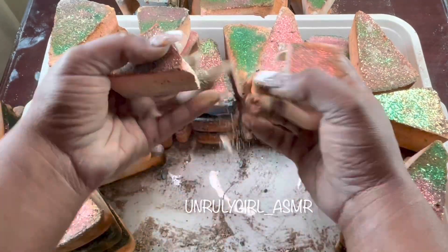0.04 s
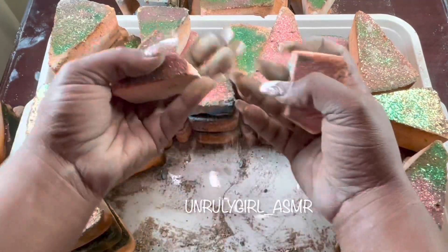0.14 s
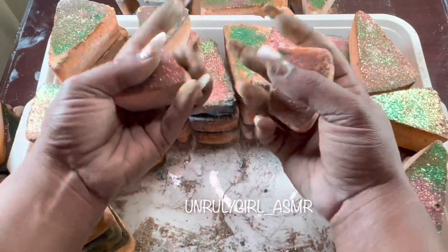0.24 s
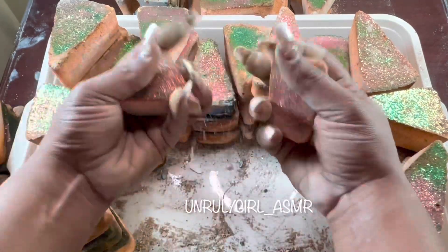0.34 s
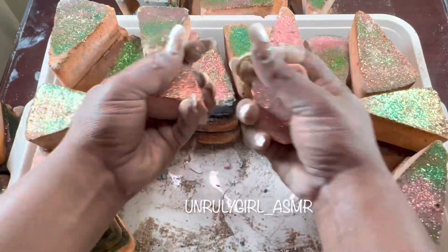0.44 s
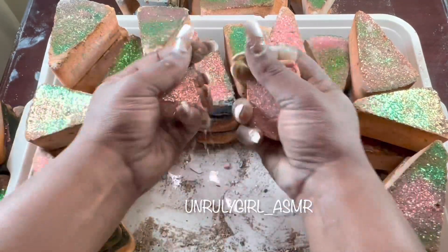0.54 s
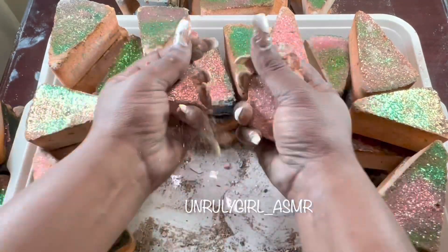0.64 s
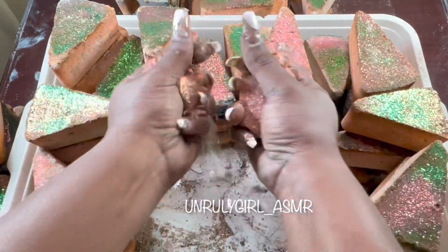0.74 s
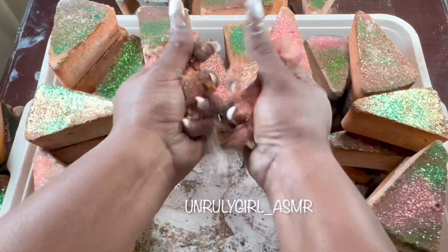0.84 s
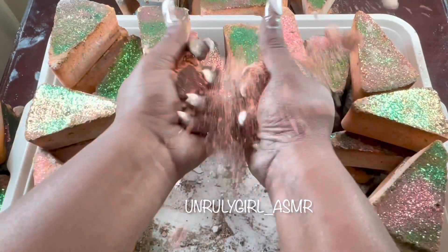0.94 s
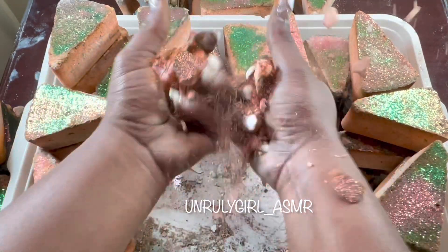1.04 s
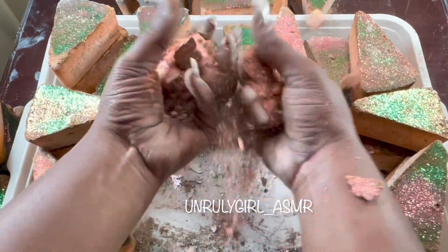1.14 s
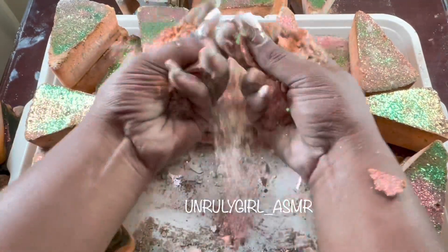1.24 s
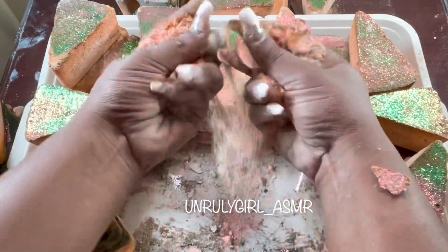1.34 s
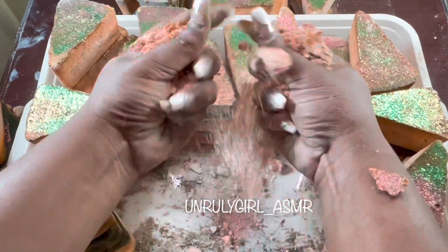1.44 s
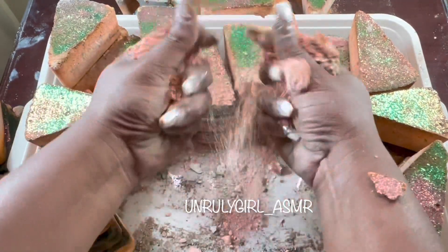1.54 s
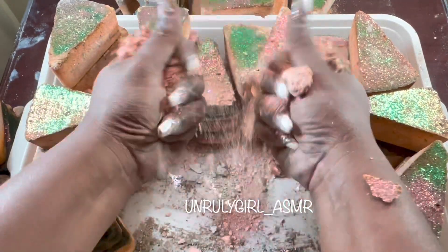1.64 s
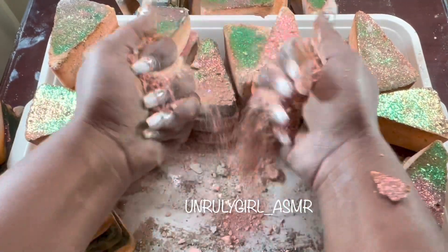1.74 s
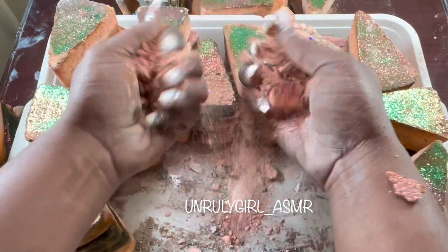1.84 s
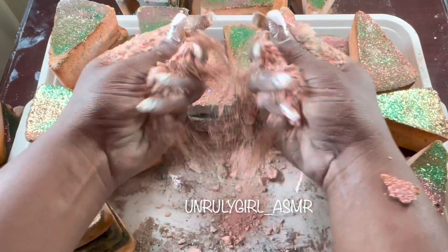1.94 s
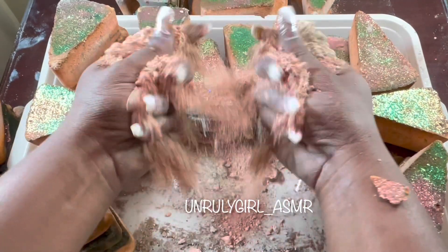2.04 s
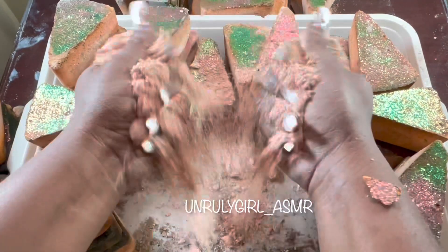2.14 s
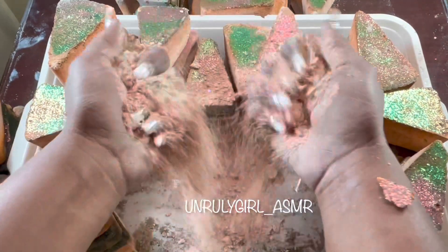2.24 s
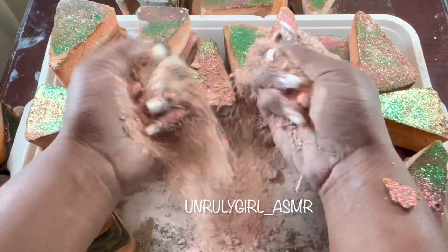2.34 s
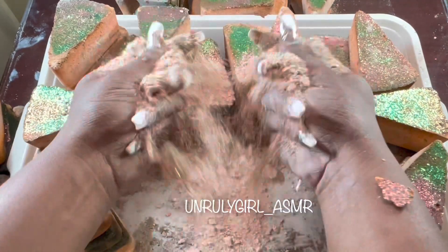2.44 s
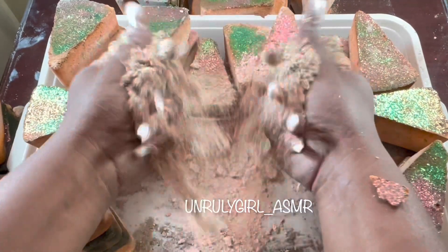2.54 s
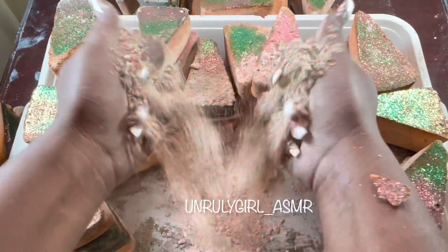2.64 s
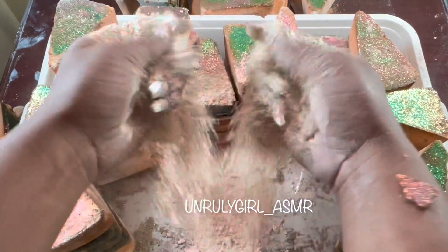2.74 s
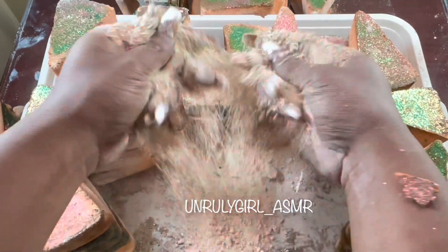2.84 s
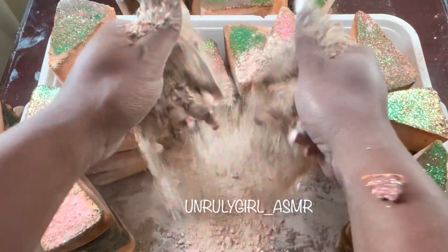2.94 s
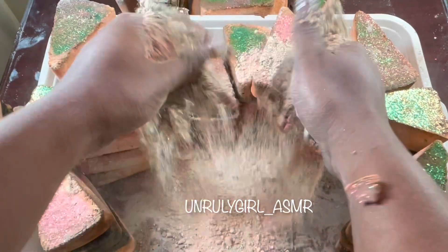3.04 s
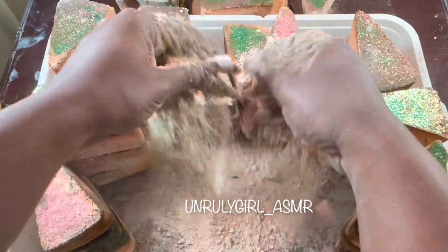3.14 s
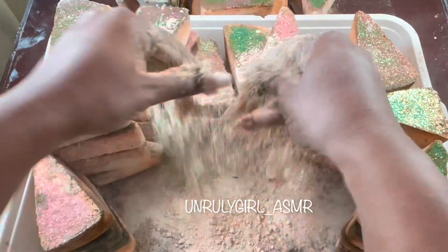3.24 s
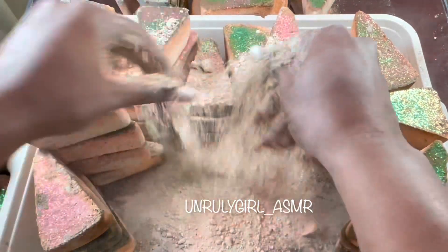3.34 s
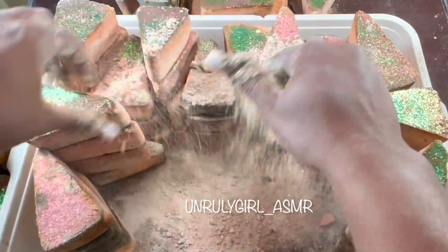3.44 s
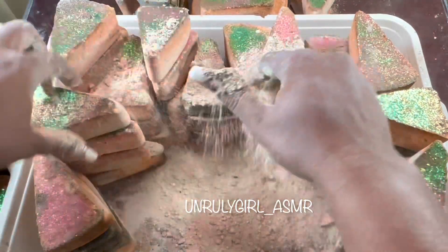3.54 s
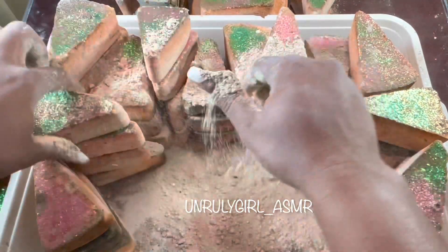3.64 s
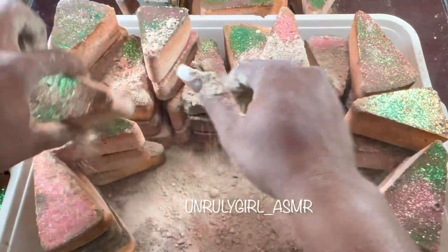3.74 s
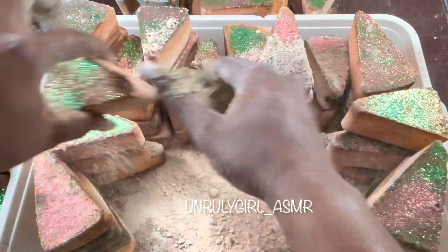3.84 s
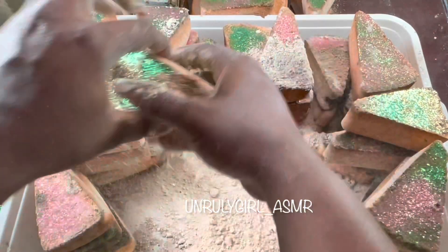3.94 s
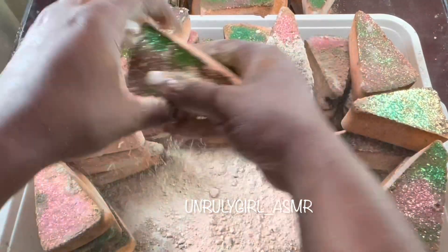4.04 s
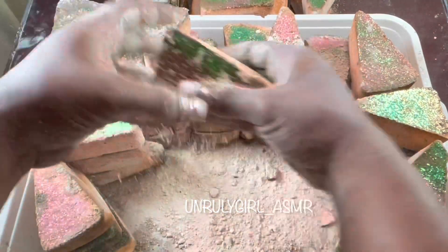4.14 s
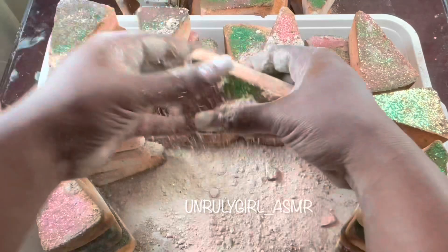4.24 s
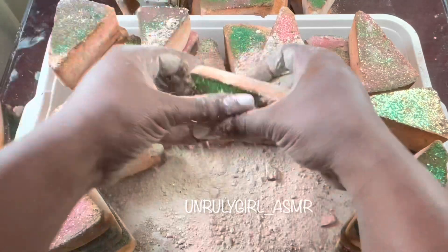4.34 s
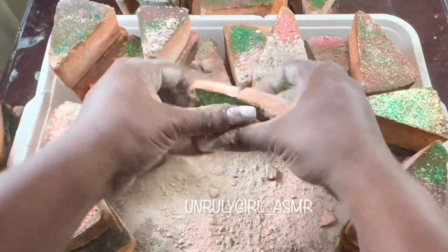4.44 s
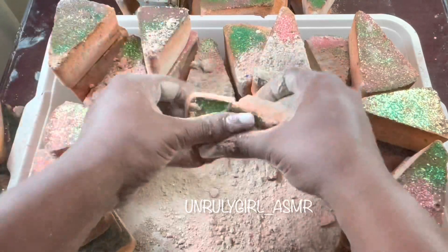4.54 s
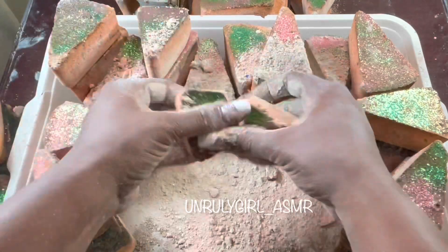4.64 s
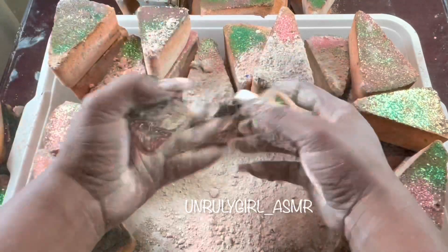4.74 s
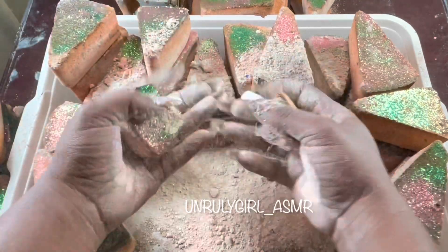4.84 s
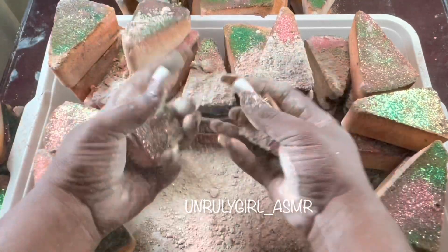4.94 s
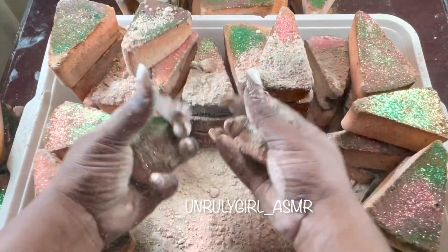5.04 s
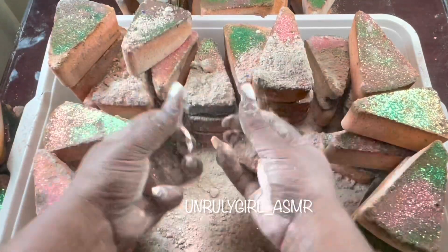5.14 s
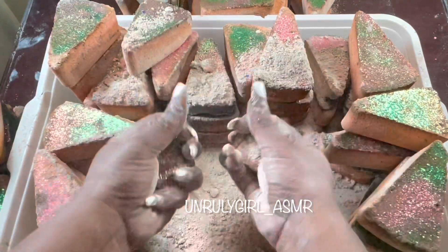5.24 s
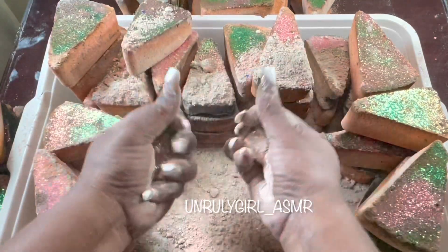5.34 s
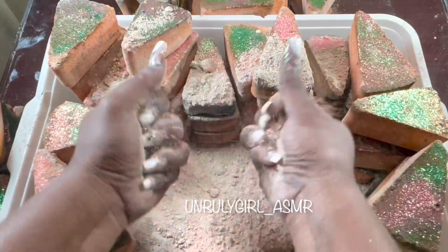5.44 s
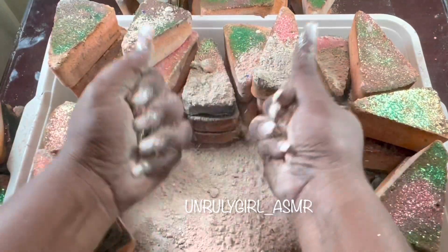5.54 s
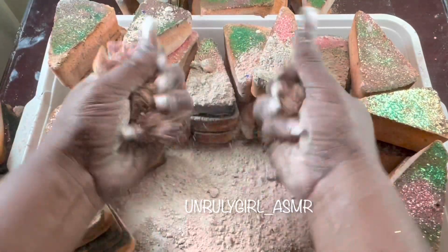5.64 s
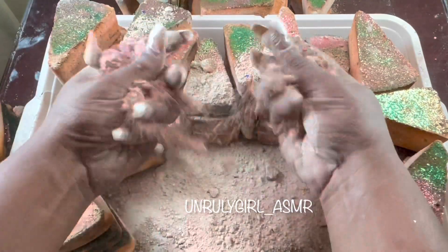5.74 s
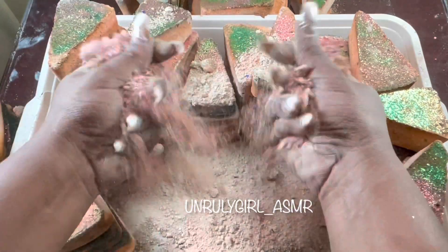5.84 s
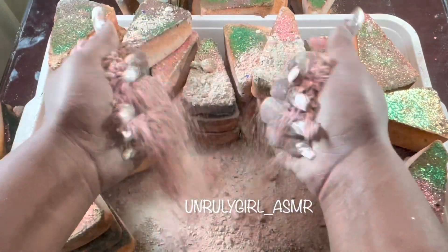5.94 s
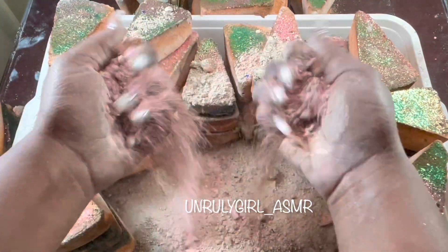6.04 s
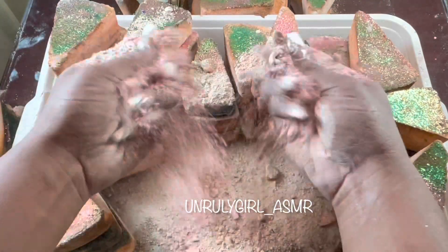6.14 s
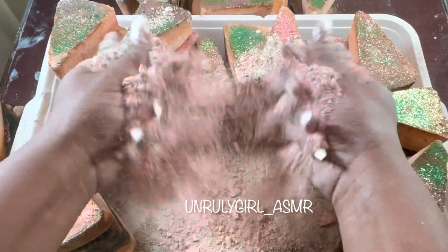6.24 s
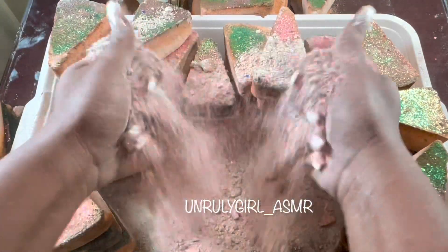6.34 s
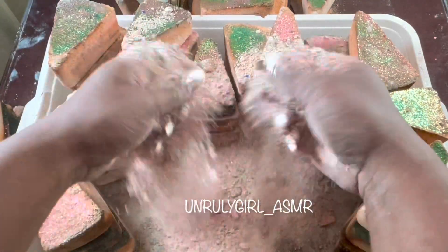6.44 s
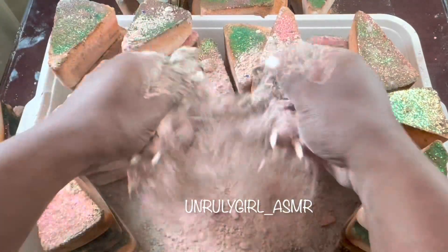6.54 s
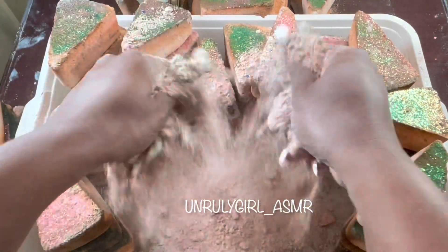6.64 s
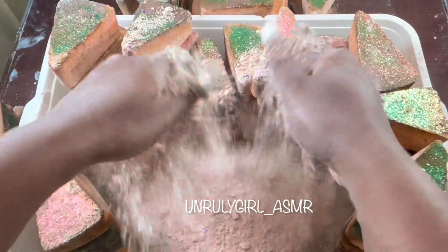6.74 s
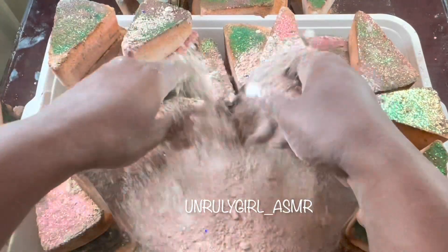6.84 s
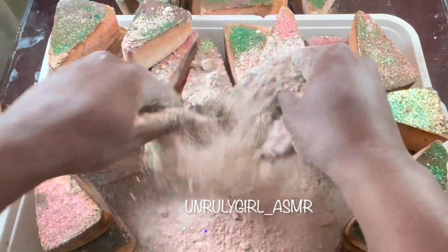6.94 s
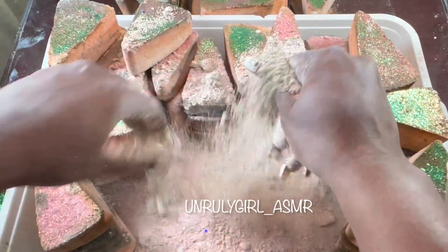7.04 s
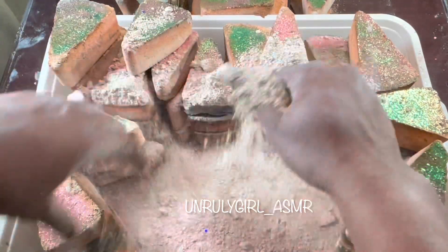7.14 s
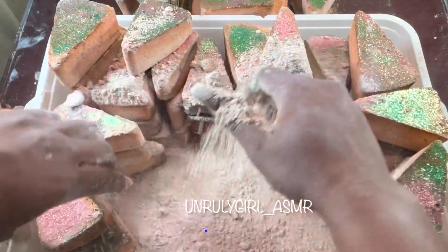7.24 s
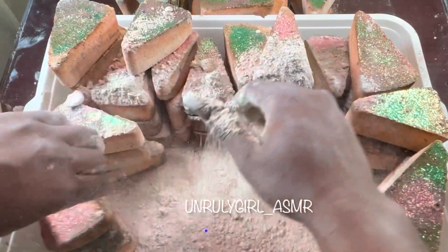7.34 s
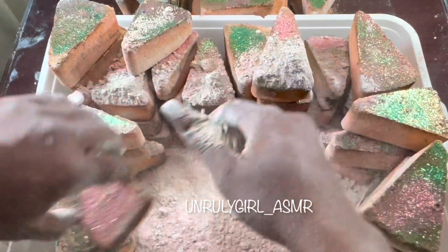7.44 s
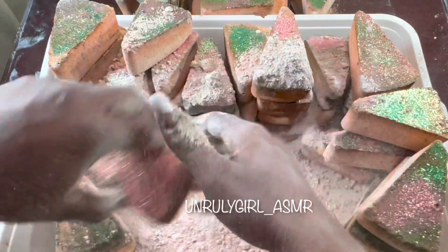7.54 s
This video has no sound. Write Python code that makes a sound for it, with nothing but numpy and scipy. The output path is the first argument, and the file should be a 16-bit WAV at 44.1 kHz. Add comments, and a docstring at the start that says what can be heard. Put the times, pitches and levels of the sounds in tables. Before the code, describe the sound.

Very close stereo capture of two hands crushing dry chalk blocks over a plastic tub in a small quiet room. Squeaky rubs and dusty handling lead to a dense run of sharp snaps and crunches, thinning into gritty crumbling. After a quieter pause of rubbing, one bright snap breaks a fresh slab, then another handful crumbles. Low hum continues underneath.

```python
"""Mains hum, rumble and faint hiss lie under two hands crushing dry chalk over a plastic tub, near two ports.
Rubs and dusty handling open; blocks snap, knock in the palms and crumble to lumps, grit and powder to 3.5 s.
Fingers then rub a fresh slab and break it; from 5.6 s a second handful crumbles until the last snaps at 7.4 s.
Snaps are decaying sines and filtered clicks, crumbs are random clicks in three colours, rubs are slips plus a
squeak; decaying sine modes ring the room's low modes and the tub, and sparse filtered clicks make the small
room."""
import sys
import numpy as np
from scipy import signal
from scipy.fft import rfft, irfft, next_fast_len
from scipy.io import wavfile
from scipy.ndimage import uniform_filter1d, map_coordinates

SR = 44100
rng = np.random.default_rng(int(sys.argv[2]) if len(sys.argv) > 2 else 0)


def transcribe(signal):
    """Save signal, clipped to [-1, 1], as a 16-bit WAV file at the path in sys.argv[1]."""
    frames = np.atleast_2d(signal).T
    limited = np.clip(frames, -1, 1)
    pcm = np.round(limited * 32767).astype(np.int16)
    wavfile.write(sys.argv[1], SR, pcm)


N = 333837
TIME = np.arange(N) / SR

# Table levels are ahead of later trims and filters; colours and modes are scaled to unit energy. Loudest
# fractures. Each row: start in seconds, crack level in dB, crack pitch in Hz, grit spray in dB, powder spray in
# dB, thud in dB.
FRACTURES = [(0.088, -18, 2730, -22.5, -34, -47), (0.486, -12.5, 1680, -21, -19, -36),
             (0.548, -15.5, 2200, -24.5, -33.5, -32.5), (0.652, -14, 1740, -50, -31, -32),
             (0.701, -4.5, 2100, -9.5, -27.5, -28.5), (0.808, -21, 1810, -21.5, -24, -31.5),
             (0.901, -40, 8000, -55, -32.5, -65), (0.967, -32, 880, -24.5, -25.5, -41),
             (1.006, -10.5, 1060, -23, -38, -25), (1.024, -9, 1540, -35, -48, -28.5),
             (1.06, -11.5, 916, -22, -28, -25.5), (1.091, -11.5, 2870, -27, -29, -29),
             (1.135, -9, 996, -25, -46, -33), (1.139, -22, 1920, -34, -37, -49),
             (1.226, -18, 2900, -21, -25, -41), (1.263, -12, 890, -27, -25.5, -28.5),
             (1.277, -9, 966, -28, -44, -30), (1.313, -31, 3270, -42, -22, -34),
             (1.363, -21, 1500, -48, -51, -56), (1.397, -5, 994, -33, -29, -23.5),
             (1.398, -20, 1590, -35, -40, -45), (1.506, -18.5, 1530, -24.5, -49, -40),
             (1.551, -31, 6060, -23.5, -22.5, -33.5), (1.666, -15.5, 1710, -34, -30, -39.5),
             (1.787, -22, 1160, -22.5, -35, -61), (1.822, -19.5, 1680, -40, -51, -60),
             (1.862, -21.5, 1640, -28, -50, -41.5), (1.943, -14, 1160, -46, -54, -41),
             (1.974, -30, 3480, -44, -24.5, -56), (2.112, -18, 2860, -35, -24, -61),
             (2.222, -20.5, 5900, -39, -27.5, -37.5), (2.385, -19, 1480, -27, -52, -39),
             (2.443, -16, 5800, -55, -33, -70), (2.565, -22, 9600, -32, -16, -46.5),
             (2.709, -17, 1790, -22.5, -28, -65), (2.79, -29, 1460, -29, -29.5, -63),
             (3.007, -14.5, 2070, -37, -41, -61), (3.09, -19, 1480, -24.5, -44, -65),
             (3.244, -14.5, 2740, -22.5, -29.5, -29), (3.36, -25, 1250, -30, -49, -40),
             (3.54, -18, 2050, -28, -38, -70), (3.586, -12.5, 1214, -31, -57, -70),
             (3.599, -17.5, 1250, -43, -46, -67), (4.02, -29.5, 1870, -56, -31.5, -69),
             (4.107, -36, 2270, -62, -43, -79), (4.174, -30.5, 2120, -46, -55, -72),
             (4.209, -28.5, 2030, -56, -45, -82), (4.4346, -23.5, 2250, -30, -27, -39),
             (4.7276, -3.5, 6700, -30, -15.5, -47.5), (4.843, -27, 6740, -57, -25.5, -61),
             (5.167, -51, 910, -39.5, -38.5, -41), (5.233, -34, 1150, -33, -70, -39),
             (5.254, -28, 2330, -38.5, -47, -61), (5.302, -50, 695, -41, -46, -45),
             (5.375, -41, 2000, -27.5, -33, -42), (5.389, -17, 1070, -21.5, -31, -37),
             (5.392, -10.5, 2560, -21, -30, -52), (5.839, -16.5, 1176, -27, -36, -35.5),
             (5.929, -17, 1810, -22, -24, -39), (5.9518, -11, 1660, -16.5, -25, -42),
             (5.989, -11.5, 1830, -22.5, -37, -43), (6.344, -24, 1330, -42, -24, -42),
             (6.399, -9, 8800, -47, -20, -42), (6.518, -12, 1200, -24, -33.5, -34),
             (6.517, -12, 4090, -33, -34, -60), (6.78, -17, 2120, -25.5, -21.5, -48),
             (6.896, -33, 890, -28.5, -31.5, -33.5), (7.04, -29.5, 1000, -32, -58, -36),
             (7.063, -10, 1030, -30, -54, -35.5), (7.224, -37, 1360, -52, -60, -48),
             (7.414, -28.5, 2150, -45, -32, -41.5)]
# Blocks bumping the cupped palms. Each row: start in seconds, level in dB, pitch in Hz, scuff in dB.
PALM_KNOCKS = [(0.408, -21.5, 78, -83), (0.488, -22, 246, -48), (4.436, -16, 292, -44),
               (4.845, -31, 250, -47.5), (4.87, -33, 80, -67), (4.966, -27, 367, -44),
               (5.388, -20, 222, -77), (5.4, -26.5, 67.6, -76), (7.346, -31, 190, -64)]
# Colours of the three grain sizes. Each row: frequency in Hz, relative density in dB per Hz.
LUMP_COLOUR = [(60, -15), (150, -1.5), (240, -1), (450, -2.5), (750, -8), (1300, -20.5), (4000, -83)]
GRIT_COLOUR = [(200, -89), (600, -7.5), (1000, 4), (1500, 4), (2200, 3.5), (3400, -1), (5000, -1),
               (8000, -41.5), (13000, -38.5)]
POWDER_COLOUR = [(500, -50), (2000, -12.5), (3200, -6.5), (5000, -1), (6500, 1.5), (8300, 3), (10200, 6.5),
                 (11200, 0.5), (12300, -42), (15000, -68)]
LUMP_RING_CYCLES = 0.85  # a lump's pop has its envelope peak here


def gain_of(db):
    """Decibels to amplitude."""
    return 10 ** (np.asarray(db) / 20)


def evened(x):
    """Scales to rms 1."""
    return x / np.sqrt(np.mean(x ** 2) + 1e-20)


def read(points, hz):
    """Interpolates a table along a log-frequency axis."""
    f, value = np.transpose(points)
    return np.interp(np.log(hz + 1), np.log(f + 1), value)


def add(mix, start_s, sound):
    """Mixes a sound in place at start_s, cut at the end of the mix."""
    part = mix[max(round(start_s * SR), 0):][:len(sound)]
    part += sound[:len(part)]


def coloured(x, spectrum):
    """Minimum-phase filter of unit energy: each click takes the spectrum and keeps its sharp front."""
    log_gain = np.log(gain_of(read(spectrum, abs(np.fft.fftfreq(2048, 1 / SR)))))
    taps = np.fft.ifft(np.exp(np.conj(signal.hilbert(log_gain)))).real[:1024]
    return signal.oaconvolve(x, taps / np.linalg.norm(taps))[:len(x)]


def drift(cutoff_hz):
    """Smooth random wander of rms 1: noise low-passed near cutoff_hz."""
    size = next_fast_len(N, real=True)
    lowpass = 1 / (1 + (np.fft.rfftfreq(size, 1 / SR) / cutoff_hz) ** 4)
    return evened(irfft(rfft(rng.standard_normal(size)) * lowpass, size)[:N])


def random_signs(shape):
    """Random polarities, +1 or -1."""
    return rng.choice([-1., 1.], shape)


def grains(per_s, spread_db, clump_db):
    """Tiny fractures as random clicks of rms 1; sizes spread exponentially in dB and swell in clumps."""
    size = gain_of(spread_db * np.minimum(rng.exponential(1, N), 4.5) + clump_db * drift(74))
    return evened(size * random_signs(N) * (rng.random(N) < per_s / SR))


def pop(hz, cycles):
    """A freed lump rings briefly: a sine whose envelope peaks at 1 after the given cycles."""
    turns = np.arange(SR // 10) * hz / SR
    envelope = turns / cycles * np.exp(1 - turns / cycles)
    return envelope * np.sin(2 * np.pi * turns)


def background():
    """Wavering mains hum over high-passed rumble, both alike at the ports, and separate hiss at each."""
    # Each row: frequency in Hz, rms level in dB.
    hum_partials = [(60, -55.5), (120, -47.5)]
    # Each row: frequency in Hz, relative density in dB per Hz.
    rumble_colour = [(15, -43.5), (30, 7.5), (55, 6), (80, 9), (110, 12.5), (170, -5.5), (300, -12.5),
                     (700, -68.5), (3000, -81)]
    hiss_colour = [(100, 10), (700, -7), (10500, -14), (12500, -39.5)]
    hum = np.zeros(N)
    for hz, db in hum_partials:
        level = gain_of(db + 0.7 * drift(3)) * np.sqrt(2)
        hum += level * np.sin(2 * np.pi * hz * TIME + 0.1 * drift(5))
    hiss = np.array([coloured(rng.standard_normal(N), hiss_colour) for _ in range(2)])
    highpass = signal.butter(3, 38, "high", fs=SR, output="sos")
    rumble = signal.sosfilt(highpass, coloured(rng.standard_normal(N), rumble_colour))
    return hum + gain_of(-49.5) * rumble + gain_of(-60.0) * hiss


def rubs():
    """Fingers slide over dry chalk: fine slips under a short swell, locking into a hoarse squeak."""
    # Each row: time at the loudest in seconds, scrape level in dB, rise in seconds, fall in seconds,
    # squeak pitch in Hz, squeak level in dB.
    strokes = [(0.03, -28.5, 0.031, 0.054, 6760, -32.5), (0.311, -18.5, 0.01, 0.026, 6100, -26),
               (.73, -26.5, 0.0099, 0.0076, 7200, -34), (3.826, -28.5, 0.0061, 0.0069, 3720, -29),
               (3.955, -40.5, 0.012, 0.024, 3110, -41), (4.06, -41.5, 0.05, 0.021, 5600, -47),
               (4.24, -41, 0.13, 0.068, 3060, -46), (4.574, -39.5, 0.022, 0.052, 5900, -39),
               (4.781, -31.5, 0.031, 0.017, 6960, -34), (4.821, -26.5, 0.0054, 0.0073, 5380, -31.5),
               (5.007, -29.5, 0.035, 0.019, 6100, -47)]
    # Each row: frequency in Hz, relative density in dB per Hz.
    rub_colour = [(400, -43), (1800, -15.5), (3100, -7.5), (4500, 1.5), (6400, 2), (8000, 6.5),
                  (10000, 10.5), (11300, 1.5), (12500, -14.5), (16000, -74.5)]
    pitch_wander, pitch_sag_per_s = 0.034, 0.25  # shares of the pitch; it sinks as the finger slows
    catch_db = 4
    slips = grains(per_s=12000, spread_db=-0.5, clump_db=2.5)
    scrape, squeak = np.zeros(N), np.zeros(N)
    wander = drift(450)
    # the finger catches and lets go
    grip = evened(np.maximum(drift(160) + 1, 0.5) * gain_of(catch_db * drift(40)))
    for peak_s, db, rise_s, fall_s, hz, squeak_db in strokes:
        near = abs(TIME - peak_s) < 0.3
        t = TIME[near] - peak_s
        swell = np.exp(-np.maximum(-t / rise_s, t / fall_s))
        pitch_hz = hz * (1 + pitch_wander * wander[near] - pitch_sag_per_s * t)
        turns = np.cumsum(pitch_hz) / SR
        scrape[near] += gain_of(db) * swell
        # squared swell: squeaks only under firm pressure
        squeak[near] += gain_of(squeak_db) * swell ** 2 * np.sin(2 * np.pi * turns)
    return coloured(scrape * slips, rub_colour) + squeak * grip


def held(start_s, end_s, rise_s, fall_s):
    """Envelope that swells up to start_s, holds, and dies away after end_s."""
    decay = np.maximum((start_s - TIME) / rise_s, (TIME - end_s) / fall_s)
    return np.exp(-np.clip(decay, 0, 20))


def shedding():
    """Levels in dB of grit, powder and lumps: grips, squeezes and handfuls add their power."""
    # Whole blocks turned, dust brushed off. Each row: start in seconds, end in seconds, powder in dB, lumps in dB.
    grips = [(0.074, 0.364, -42.5, -50.5), (0.43, 0.966, -50.5, -65.5), (3.405, 3.767, -57.5, -66),
             (3.83, 3.872, -44.5, -61), (3.939, 4.312, -51, -86), (4.577, 5.133, -54, -65),
             (5.172, 5.446, -52, -63), (7.312, 7.408, -49, -44)]
    # Fists tighten. Each row: time at the tightest in seconds, grit in dB, half length in seconds.
    squeezes = [(0.58, -48.5, 0.032), (0.737, -42, 0.077), (1.093, -40, 0.021), (1.44, -40.5, 0.05),
                (1.806, -42.5, 0.059), (2.173, -39.5, 0.086), (2.33, -43, 0.062), (3.011, -37, 0.05),
                (3.226, -42, 0.059), (3.617, -45, 0.056), (5.978, -42.5, 0.16), (6.388, -40, 0.11),
                (6.685, -40, 0.076)]
    # Broken handfuls crumble in the fists until dropped. Each row: start in seconds, end in seconds,
    # grit in dB, lumps in dB, sag in dB per second.
    handfuls = [(1.01, 3.46, -40, -46.5, 4.5), (5.576, 7.31, -49, -49, 1.5)]
    moves = []  # ([grit, powder, lumps] in dB, envelope)
    for start_s, end_s, grit_db, lumps_db, sag_db_per_s in handfuls:
        sag = gain_of(-sag_db_per_s * np.maximum(TIME - start_s, 0))
        shape = held(start_s, end_s, rise_s=0.048, fall_s=0.064) * sag
        moves.append(([grit_db, grit_db + 3, lumps_db], shape))
    for peak_s, db, half_s in squeezes:
        shape = np.exp(-np.minimum(0.5 * ((TIME - peak_s) / half_s) ** 2, 20))
        moves.append(([db, db - 2, db - 7.5], shape))
    for start_s, end_s, powder_db, lumps_db in grips:
        shape = held(start_s, end_s, rise_s=0.019, fall_s=0.016)
        moves.append(([powder_db - 13.5, powder_db, lumps_db], shape))
    levels_db, shapes = zip(*moves)
    return 10 * np.log10(gain_of(levels_db).T ** 2 @ np.square(shapes))


def chips(per_s, spread_db):
    """Small pieces break off at random, each popping at the pitch of its own size; rms 1."""
    out = np.zeros(N)
    for place, size, strength, ring in rng.random((int(per_s * N / SR), 4)):
        hz = 950 * 5 ** size
        level = gain_of(spread_db * min(-np.log(1 - strength), 2))
        add(out, place * N / SR, level * pop(hz, (0.5 + ring) / 2))
    return evened(out)


def patchy(x):
    """The mix of crumb sizes keeps changing, so bands swell and fade on their own."""
    uneven_db = 2.5
    z = signal.stft(x, nperseg=256)[2]
    field = uniform_filter1d(rng.standard_normal(z.shape), size=5, axis=0)
    field = evened(uniform_filter1d(field, size=6, axis=1))
    return signal.istft(z * gain_of(uneven_db * field), nperseg=256)[1][:N]


def crumbling():
    """Chalk gives way under pressure in three grain sizes, shedding chips as it goes."""
    # Each row: frequency in Hz, relative density in dB per Hz.
    chip_colour = [(100, -7.5), (10500, 11.5), (11500, 6), (12500, -32), (16000, -63.5)]
    grit_db, powder_db, lumps_db = shedding()
    squeeze_db = 1.0 * drift(13.0)  # the grip slips and catches for all sizes together
    grit_level = gain_of(grit_db + squeeze_db)
    grit = grains(per_s=4500, spread_db=3.4, clump_db=1.8) * grit_level
    powder = grains(per_s=8000, spread_db=2.5, clump_db=1.3) * gain_of(powder_db + squeeze_db + 3.0)
    lumps = grains(per_s=760, spread_db=3.0, clump_db=2.0) * gain_of(lumps_db + squeeze_db - 0.5)
    broken = chips(per_s=150, spread_db=7.5) * grit_level * gain_of(-3)
    flow = patchy(1.05 * coloured(grit, GRIT_COLOUR) + coloured(powder + 0.094 * grit, POWDER_COLOUR))
    return flow + coloured(broken, chip_colour) + coloured(lumps, LUMP_COLOUR)


def resonate(x, hz, width_hz):
    """One two-pole resonance, scaled so that white noise keeps its level."""
    r = np.exp(-np.pi * width_hz / SR)
    y = signal.lfilter([1, 0, -1], [1, -2 * r * np.cos(2 * np.pi * hz / SR), r * r], x)
    return y * np.sqrt((1 - r * r) / 2)


def piece(x, hz):
    """The broad, steep-sided ring of a lump of chalk; keeps the energy of x."""
    y = resonate(resonate(x, hz, hz * 0.9), hz, hz * 0.9)
    return y * np.linalg.norm(x) / (np.linalg.norm(y) + 1e-12)


def splinters(count=3):
    """After each break a few more pieces let go near the same pitch; later ones are weaker."""
    span_cycles, top_db = 15, -9  # of the break's pitch; relative to the break
    out = np.zeros(N)
    for start_s, peak_db, hz, *_ in FRACTURES:
        for k, (wait, size) in enumerate(rng.random((count, 2))):
            late = (k + 0.5 + wait) / (count + 0.5)
            level = gain_of(peak_db + top_db - 10 * late)
            sound = level * pop(hz * (0.85 + 0.5 * size), LUMP_RING_CYCLES)
            add(out, start_s + late * span_cycles / hz, sound)
    return out


def cracks():
    """A crack tears through the block, the freed lump pops in two modes; low pieces grind longer."""
    # Each row: frequency in Hz, relative density in dB per Hz.
    break_colour = [(100, 1.5), (900, 4.5), (10500, 12), (12500, 17.5), (16000, -37.5)]
    ring_spread, lead_s = 0.2, 0.008
    overtone_ratio, overtone_db, tear_db = 1.62, -9.5, -3.5  # levels relative to the pop
    t = np.arange(SR // 10) / SR - lead_s
    out = np.zeros(N)
    for start_s, peak_db, hz, grit_db, *_ in FRACTURES:
        cycles = LUMP_RING_CYCLES * np.exp(ring_spread * rng.uniform(-1, 1))
        ratio = overtone_ratio * rng.uniform(0.9, 1.1)
        overtone = gain_of(overtone_db) * pop(hz * ratio, cycles * ratio)
        add(out, start_s, gain_of(peak_db) * (pop(hz, cycles) + overtone))

        age = np.maximum(t, 0) * hz / 1.1
        tear = random_signs(len(t)) * age * np.exp(-age)
        crack = piece(tear, hz) + tear * (hz / 9000) ** 2.4  # small pieces also spit treble
        add(out, start_s - lead_s, gain_of(peak_db + tear_db) * crack / abs(crack).max())

        # faces start to give just before the crack, then grind near the same pitch
        contact = np.exp(-np.maximum(t / 0.014 * np.sqrt(hz / 1000), -t / 0.002))
        grind = random_signs(len(t)) * (rng.random(len(t)) < 0.06) * contact
        add(out, start_s - lead_s, gain_of(grit_db + 6) * piece(grind, hz * 1.1))
    return coloured(out + splinters(), break_colour)


def sprays(levels_db, fast_s, slow_s, slow_db):
    """Envelope of the avalanches that follow the snaps: a quick burst, then a slower trickle."""
    t = np.arange(SR // 5) / SR
    power = np.zeros(N)
    shape = np.exp(-2 * t / fast_s) + gain_of(slow_db) ** 2 * np.exp(-2 * t / slow_s)
    for row, db in zip(FRACTURES, levels_db):
        add(power, row[0], gain_of(db) ** 2 * shape)
    return np.sqrt(power)


def debris():
    """Every snap throws off a spray of grit and powder: random clicks under decaying bursts."""
    _, _, _, grit_db, powder_db, _ = np.transpose(FRACTURES)
    grit = grains(per_s=5000, spread_db=2.8, clump_db=1.5)
    grit *= sprays(grit_db - 10, fast_s=0.005, slow_s=0.024, slow_db=-5)
    powder = grains(per_s=6700, spread_db=5.5, clump_db=3.0)
    powder *= sprays(powder_db + 7.5, fast_s=0.0025, slow_s=0.033, slow_db=-14.5)
    return coloured(grit, GRIT_COLOUR) + coloured(powder, POWDER_COLOUR)


def ringing(x, modes):
    """Plays x into a table of decaying sine modes, together of unit energy."""
    t = np.arange(SR // 4) / SR
    ring = sum(gain_of(db - 60 * t / t60_s) * np.sin(2 * np.pi * hz * t) for hz, db, t60_s in modes)
    return signal.oaconvolve(x, ring / np.linalg.norm(ring))[:N]


def thuds():
    """Snaps and scuffing blocks thump: noise bursts sound low and drive the room's low modes."""
    # Each row: frequency in Hz, relative level in dB, t60 in seconds.
    room_modes = [(177, -6, 0.45), (214.7, -5.5, 0.28), (318.8, -4, 0.22), (362, -8, 0.17),
                  (425.6, 1.5, 0.19), (533.7, -6.5, 0.11)]
    scuff_decay_s = 0.035
    shake = sprays(np.transpose(FRACTURES)[-1], fast_s=0.0034, slow_s=0.023, slow_db=-6.0)
    t = np.arange(SR // 4) / SR
    for start_s, *_, scuff_db in PALM_KNOCKS:
        add(shake, start_s, gain_of(scuff_db) * np.exp(-t / scuff_decay_s))
    push = random_signs(N) * shake
    return gain_of(1.0) * coloured(push, LUMP_COLOUR) + gain_of(-0.5) * ringing(push, room_modes)


def knocks():
    """A block bumps the soft palm: a few low cycles that swell and die."""
    out = np.zeros(N)
    for start_s, db, hz, _ in PALM_KNOCKS:
        add(out, start_s, gain_of(db) * pop(hz, cycles=0.62))
    return out


def ports(x):
    """The right port takes a phase lag by frequency; lag and balance wander as grains break in either hand."""
    # Left lead over right. Each row: frequency in Hz, phase in radians.
    port_phase = [(100, 0), (750, -.6), (1100, .2), (2200, .15), (3900, .8), (4600, 2), (5300, 5.2),
                  (7500, 7.9), (8500, 9.3), (9400, 9.55), (11800, 12.2)]
    size = next_fast_len(N + SR // 10)
    lag = np.exp(-1j * read(port_phase, np.fft.rfftfreq(size, 1 / SR)))
    right = irfft(rfft(x, size) * lag, size)[:N]
    place = drift(90)
    right = map_coordinates(right, [np.arange(N) - 0.3 * place], order=3)  # lag in samples
    return np.array([x, right]) * gain_of(np.array([place, -place]) * 0.5)


def reflections():
    """Sparse random reflections, alike at both ports only in the bass, each band dying at its own speed."""
    # Each row: frequency in Hz, t60 in seconds.
    room_t60 = [(100, 0.29), (1200, 0.2), (10000, 0.12)]
    # Each row: frequency in Hz, share common to both ports.
    port_likeness = [(150, 1), (300, .7), (600, 0)]
    taps = random_signs((2, SR // 2)) * (rng.random((2, SR // 2)) < 1 / 10)
    taps[:, :SR // 400] = 0
    hz, t, z = signal.stft(taps, SR, nperseg=256)
    t60_s = read(room_t60, hz)[:, None]
    same = read(port_likeness, hz)[:, None]
    z = np.array([z[0], same * z[0] + np.sqrt(1 - same ** 2) * z[1]])
    decay = gain_of(-60 * t / t60_s) / np.sqrt(t60_s)
    tail = signal.istft(z * decay, SR, nperseg=256)[1]
    return tail / np.linalg.norm(tail[0])


def room(x, count=4):
    """Moving hands change the reflections: crossfades through count patterns in turn, repeating."""
    turn_s = 0.3102
    out = 0
    for k in range(count):
        distance = abs((TIME / turn_s + k) % count - count / 2)
        fade = np.cos(np.pi / 2 * np.minimum(distance, 1))
        out = out + signal.oaconvolve((x * fade)[None], reflections(), axes=1)[:, :N]
    return out


def scene():
    """Chalk and tub sound close to the ports; room and background surround them."""
    # Tub's plastic wall. Each row: frequency in Hz, relative level in dB, t60 in seconds.
    wall_modes = [(978, 2, .05), (1120, -1, .02), (1433, -1, .07), (1615, 1, .07)]
    # Each row: frequency in Hz, send level in dB.
    room_send = [(100, -18), (550, -3), (780, -9), (1100, -10), (1700, -11), (3000, -7), (4800, -8),
                 (6300, -13), (9000, -19), (11000, -11)]
    snaps, crumbs = cracks(), crumbling()
    chalk = crumbs + snaps + debris() + knocks() + rubs()
    wall = ringing(gain_of(-23) * snaps + gain_of(-31.5) * crumbs, wall_modes)
    add(chalk, 0.002, thuds() + wall)  # the tub answers a moment later
    # one clear, dull reflection from a nearby wall
    echo = signal.lfilter(*signal.butter(2, 2000, fs=SR), snaps)
    add(chalk, 0.015, gain_of(-14) * echo)
    size = next_fast_len(N + SR // 10)
    send_gain = gain_of(read(room_send, np.fft.rfftfreq(size, 1 / SR)))
    sent = irfft(rfft(chalk, size) * send_gain, size)[:N]
    return gain_of(-1.5) * ports(chalk) + room(sent) + background()


def record(dry):
    """Full-scale limit, then a linear-phase low-pass."""
    edge_hz = 15800
    lowpass = signal.firwin(511, edge_hz, window=("kaiser", 9), fs=SR)
    return signal.oaconvolve(np.clip(dry, -1, 1), lowpass[None], "same")


dry = scene()
out = record(dry)
transcribe(out)
```